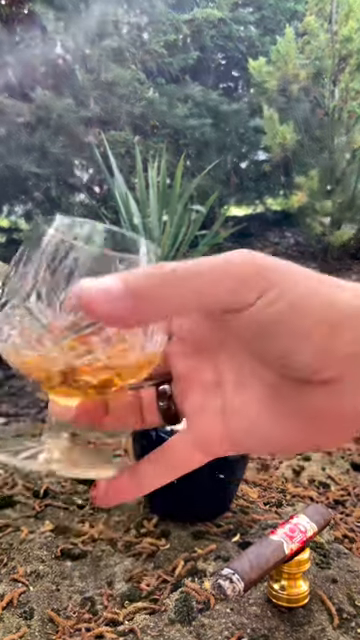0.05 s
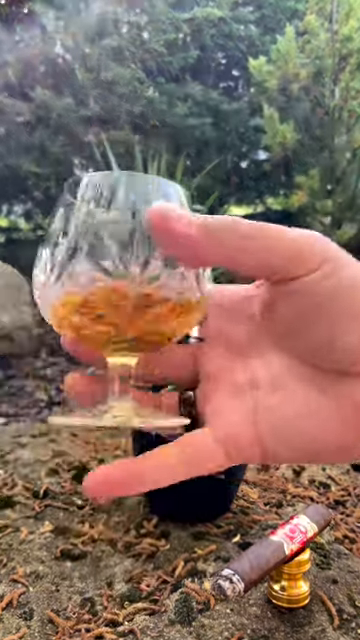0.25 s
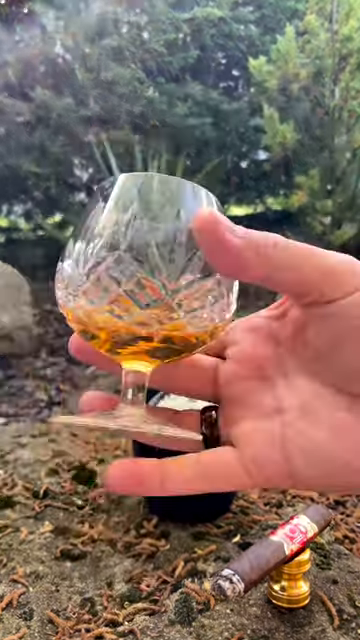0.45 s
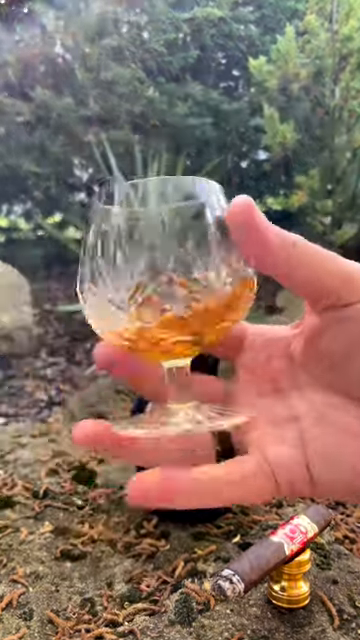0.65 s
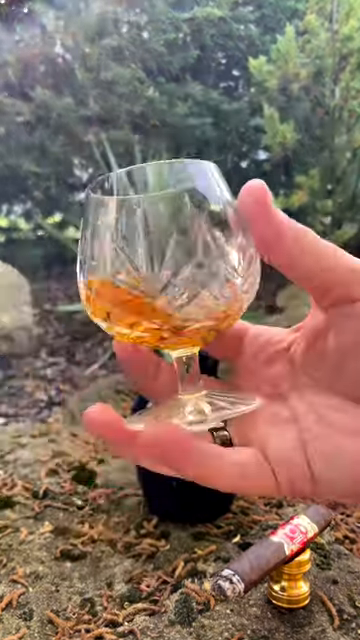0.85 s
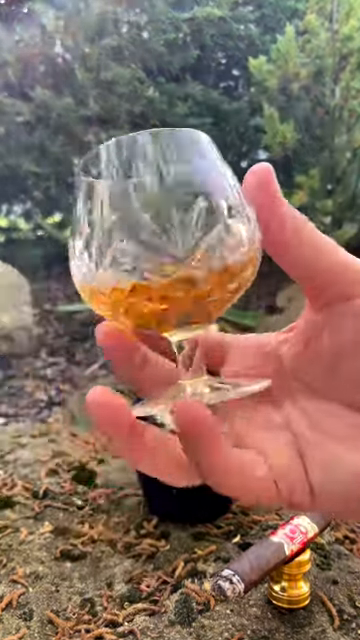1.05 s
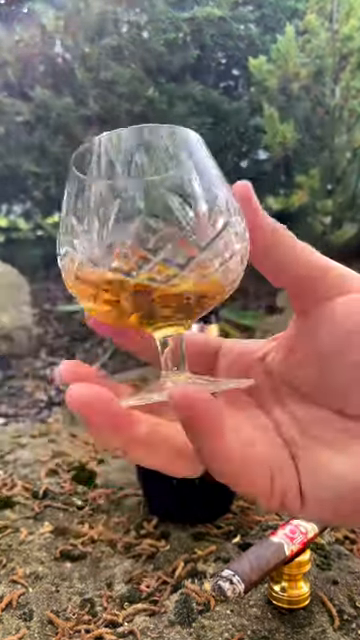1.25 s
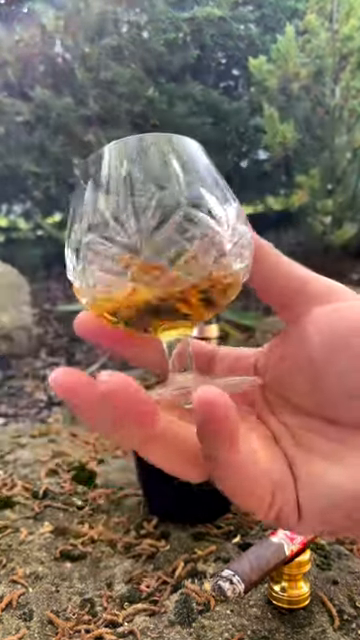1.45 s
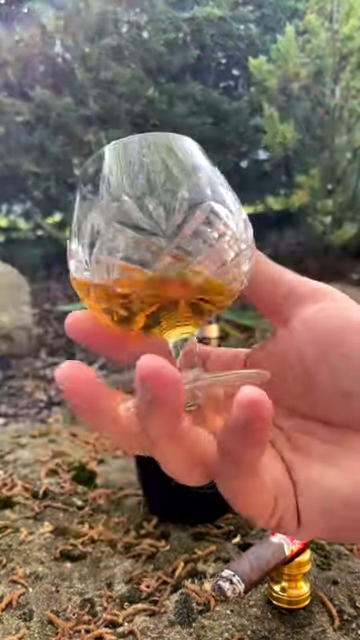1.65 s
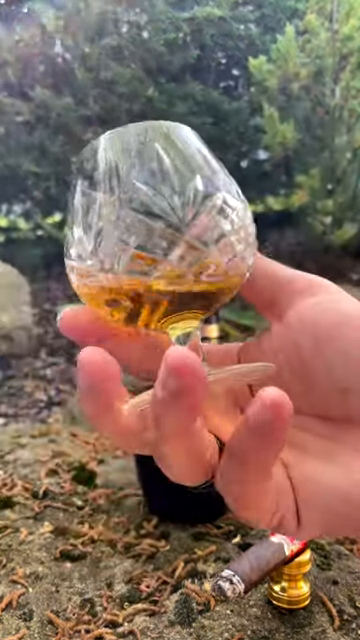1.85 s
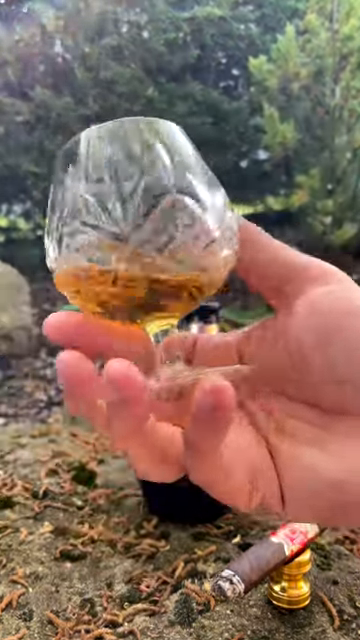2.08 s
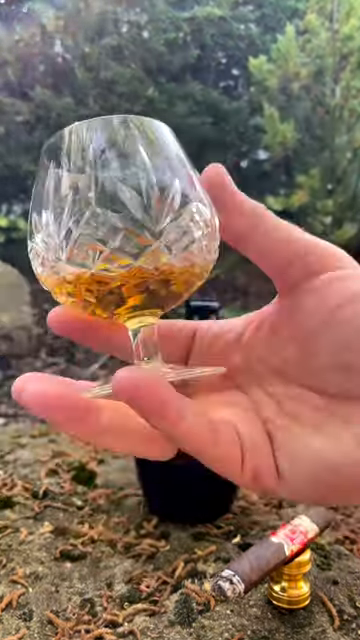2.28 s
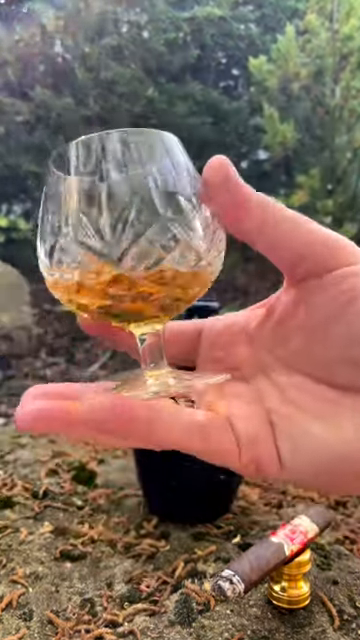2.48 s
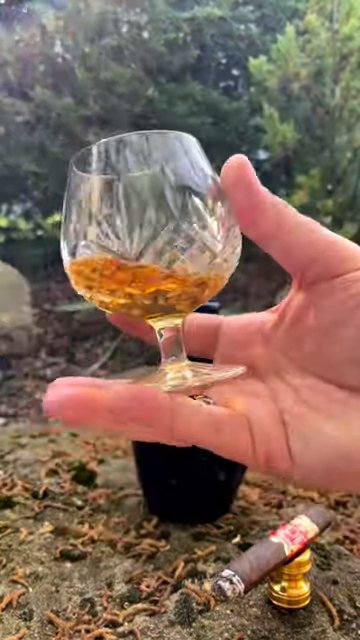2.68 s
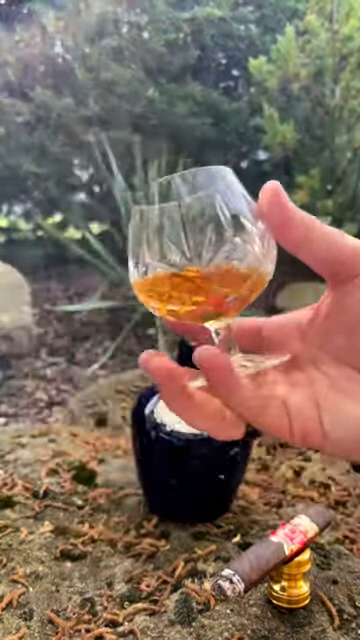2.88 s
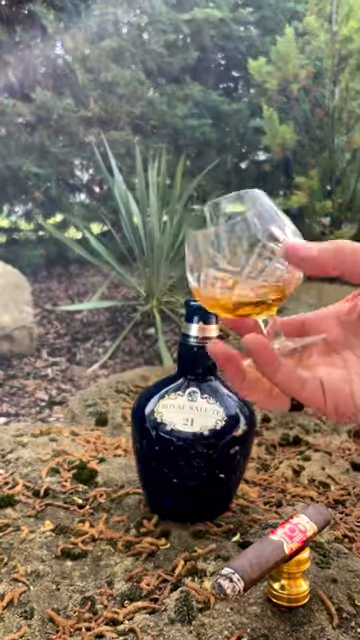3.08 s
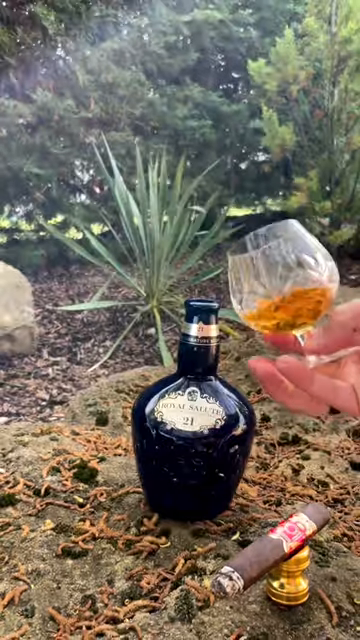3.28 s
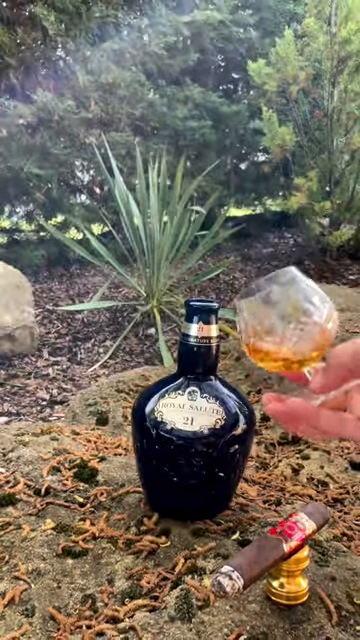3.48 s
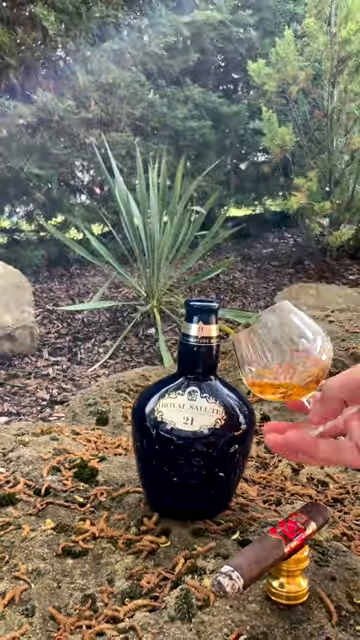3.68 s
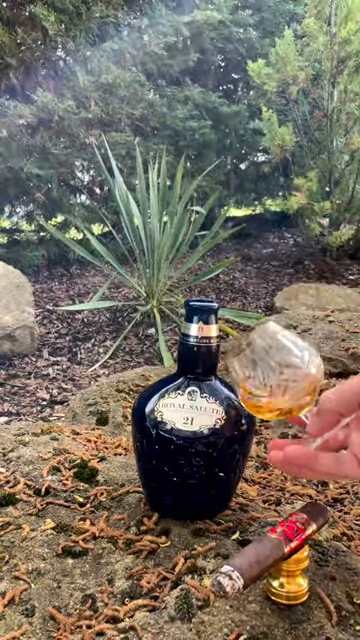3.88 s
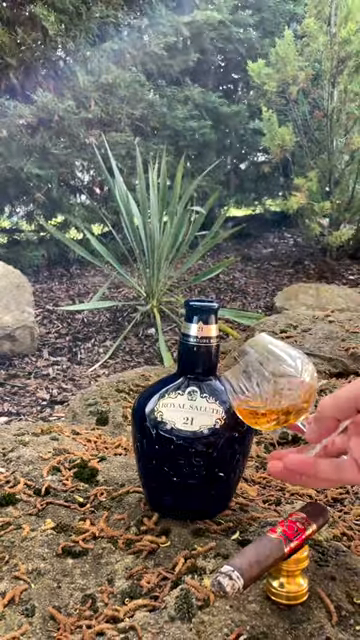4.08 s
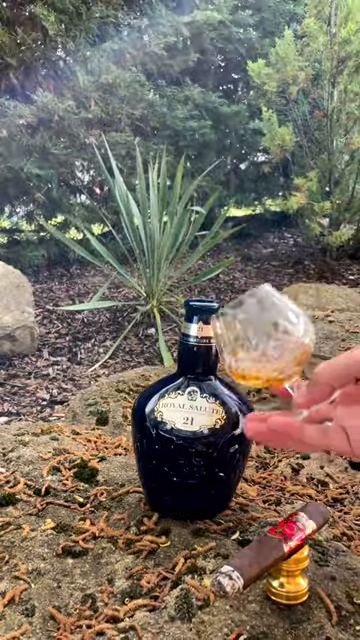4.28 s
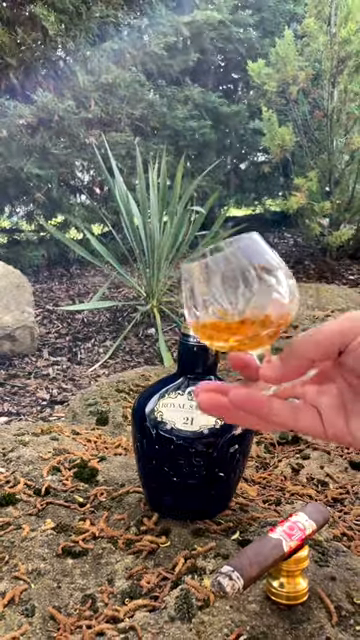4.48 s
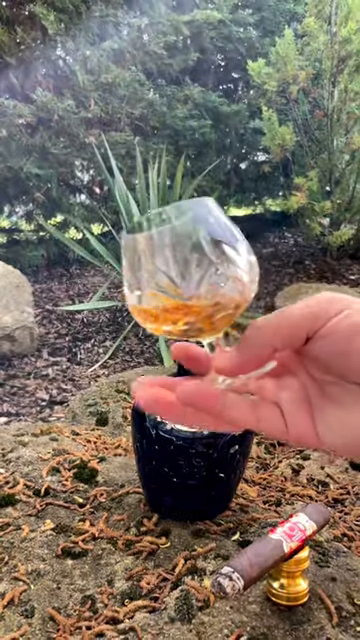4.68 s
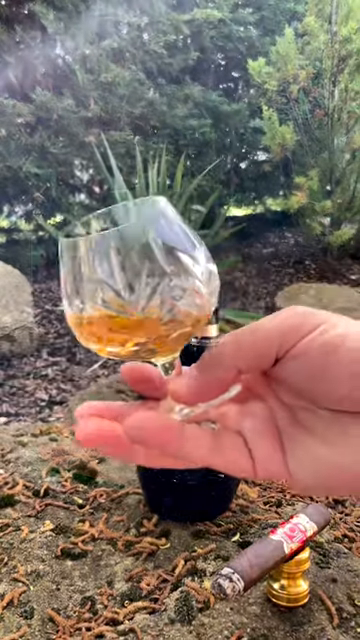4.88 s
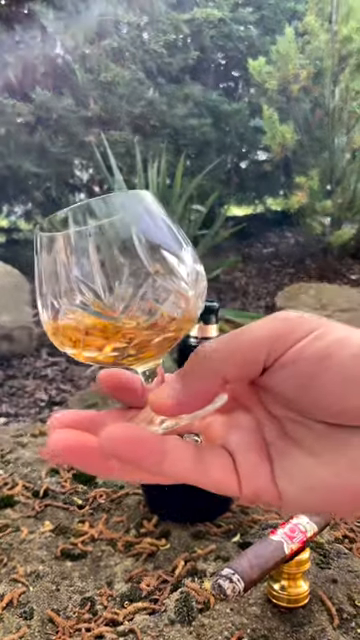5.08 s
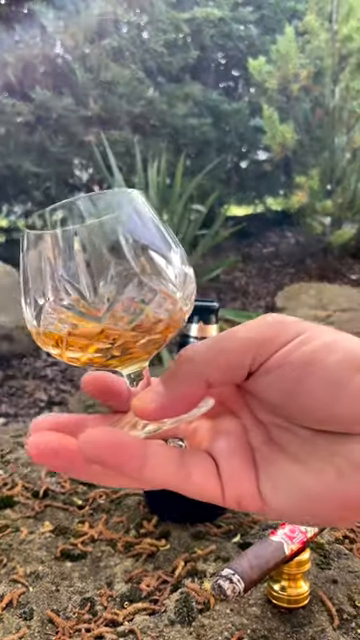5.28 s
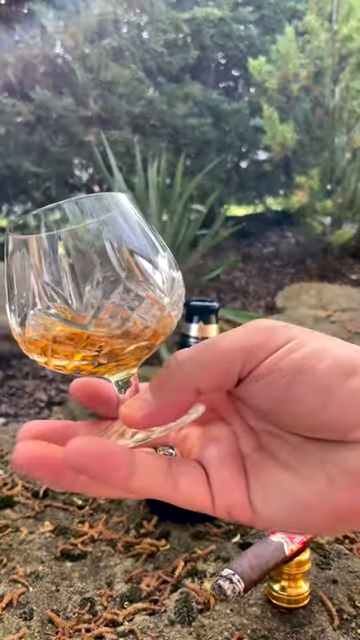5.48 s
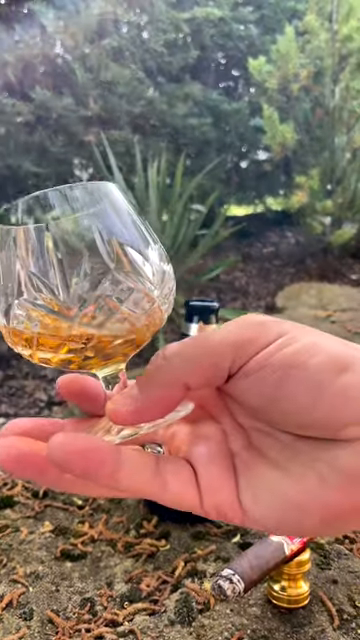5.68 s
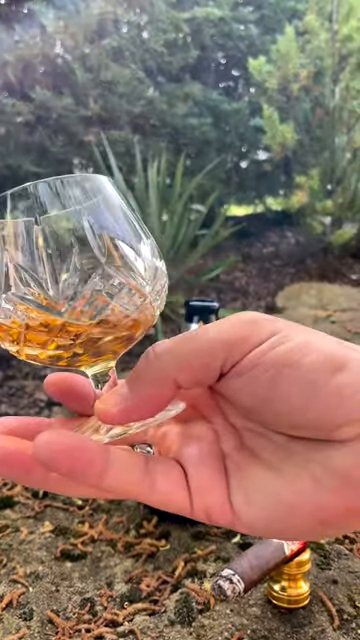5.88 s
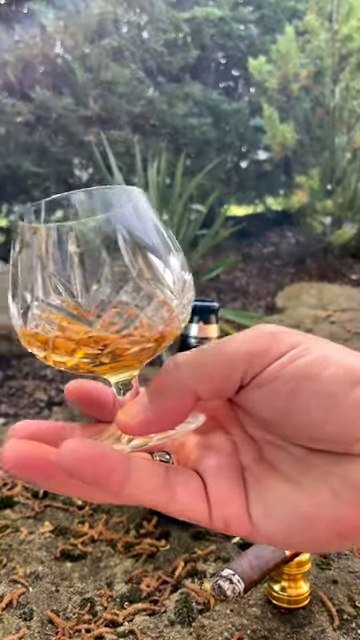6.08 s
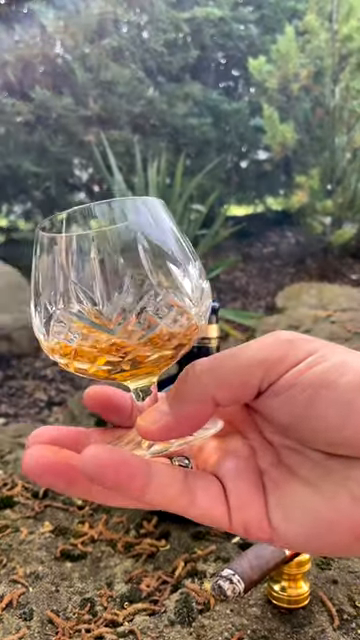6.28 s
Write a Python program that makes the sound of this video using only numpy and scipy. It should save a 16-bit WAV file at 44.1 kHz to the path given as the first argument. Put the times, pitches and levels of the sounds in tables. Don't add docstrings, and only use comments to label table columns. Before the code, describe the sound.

Close handheld stereo pickup outdoors. Four seconds of very soft road rumble, faint motor drone, scattered twitters and cloth movement lead to a sharp crystal-against-bottle double clink. The glass rings on, first bright and wobbling, shifting between left and right, then thinner and steadier with slow beating. Rustles and faint hand ticks accompany the fading tone while traffic murmurs behind.

```python
import sys
import numpy as np
from scipy import signal
from scipy.io import wavfile
from scipy.ndimage import uniform_filter1d

SR = 44100
rng = np.random.default_rng(int(sys.argv[2]) if len(sys.argv) > 2 else 0)


def amplitude_ratio(level_db):
    exponent = np.asarray(level_db, float) / 20
    return 10 ** exponent


def dump_mix(stems):
    frames = np.atleast_2d(stems).T
    limited = np.clip(frames, -1, 1)
    pcm = np.round(limited * 32767).astype(np.int16)
    wavfile.write(sys.argv[1], SR, pcm)


N = 279594
PORTS = np.array([[1], [-1]])

CONTACTS = [
    3.9997,
    4.0072,
    4.0609,
    4.1175,
]
# (level [dB], frequency [Hz], t60 [s], splash of reflections [dB], its treble [dB])
KNOCKS = [
    (-36, 3300, .008, -52, -3),
    (-7.5, 3520, .008, -28, -2),
    (-9, 1550, .004, -29, -4),
    (-32, 3500, .013, -44, -16),
]
KNOCK_LEAD = [.4, .4, .05, .2]
# (time [s], level [dB], frequency [Hz], t60 [s])
CLACKS = [(4.0072, -13, 1750, .006), (4.0072, -26, 6100, .008), (4.0072, -22, 7700, .008),
          (4.0074, -21, 14000, .005), (4.0074, -27, 9500, .008), (4.06062, -12.5, 2500, .005),
          (4.0075, -39, 480, .03), (4.061, -39, 560, .025), (4.0615, -28, 3300, .018),
          (4.062, -33, 5830, .016), (4.0715, -34, 5200, .014), (4.098, -45, 3700, .02),
          (4.106, -46, 3400, .015), (4.1165, -33, 3700, .012), (4.1185, -40, 5900, .014),
          (4.126, -44, 3600, .02), (4.0085, -30, 850, .008), (4.0612, -24, 945, .012),
          (4.0075, -38, 240, .03), (4.0075, -30, 4800, .01), (4.0755, -33, 2100, .01)]

# (time [s], second rim mode [Hz])
SLOSH = [
    (4.05, 2882),
    (4.11, 2894),
    (4.155, 2892),
    (4.235, 2857),
    (4.265, 2860),
    (4.33, 2897),
    (4.38, 2908),
    (4.6, 2904),
    (5.0, 2903),
]
REST_HZ, THIRD_HZ = 2907, 5211
LOW_HZ, LOW_LOADING = 1206.8, 1.35
LOADING_HZ = 5500
# (time [s], shift [Hz])
LOW_DRIFT = [(4.02, -2), (4.15, -3), (4.22, -1), (4.32, -3), (4.4, 0), (5, 0), (5.7, 1), (6.3, 3)]
ROCK_S, ROCK_PERIOD_S, ROCK_TAU_S, ROCK_HZ = 4.77, .43, 1.6, (3.2, 2.6)
# (start time [s], split [Hz])
SPLITS = [
    (4.012, 6.8),
    (4.13, 8.3),
    (4.3, 2.68),
    (4.89, 4.26),
]
FIRST_BEAT = -.32
SWING_S, SWING_TURNS, SWING_TAU_S = 4.43, .47, .5

# (time [s], left [dB], right [dB], weak/strong share
LOW_PAIR = [(4.064, -26, -27, 0.2, 0.13), (4.13, -35, -26.5, 0.57, 0.65), (4.195, -30.5, -28.5, 1, 0.9),
            (4.253, -26, -25, 0.97, 0.74), (4.3, -31, -23, 0.61, 0.16), (4.375, -33, -31, 0.73, 0.13),
            (4.46, -32, -28.5, 0.79, .15),
            (4.51, -37.5, -33, 0.76, .15), (4.701, -35.5, -34.5, 0.34, 0.2),
             (5.05, -34.5, -33.5, 0.82, 0.84), (5.401, -36.5, -36, 0.45, 0.5), (5.8, -38.5, -38, .33, 0.46)]
# (time [s], left [dB], right [dB], left
SECOND_MODE = [(4.075, -23, -21, 0), (4.135, -26.5, -22, -.15), (4.175, -36, -20.3, .1),
               (4.215, -28, -20.8, 1.1), (4.3, -21.8, -24.5, 1.05), (4.335, -23, -29.5, .9),
               (4.365, -28, -36, .7), (4.395, -27.8, -28.5, .55), (4.43, -26.8, -26.6, .45),
               (4.465, -28, -29, .45), (4.515, -34, -34, .45), (4.6, -31, -39, 1), (4.645, -33, -45.5, .8),
                (4.72, -43.5, -53, .35), (4.77, -45.5, -51, .7), (4.9, -43.5, -43.5, 1.25),
                (4.96, -48, -45, 1.6), (5.05, -50.5, -50, 2), (5.18, -54, -55.5, 2),
                (5.32, -55.5, -56.5, 1.5), (5.42, -59.5, -58, 1.5), (5.5, -59, -60, 1.4)]
# (time [s], left [dB], right [dB], left lead [rad])
THIRD_MODE = [(4.075, -32.5, -36.5, -2.6), (4.115, -35.5, -39, -2.7), (4.14, -37.5, -37.5, -3.1),
              (4.165, -38, -39.5, -3.8), (4.2, -47, -44, -4.7), (4.222, -41.5, -43.5, -6),
              (4.265, -42.5, -43.5, -6.5), (4.305, -48.5, -51, -5.9), (4.342, -56.5, -73, -5.2),
              (4.37, -57, -68, -6.3), (4.44, -63.5, -67.5, -6.3), (4.49, -64.5, -67, -6.2)]
LOW_FIRST, SECOND_FIRST, THIRD_FIRST = (-29, -24.5, 1, 3), (-31, -29, -.05), (-32.5, -36, -2.6)
LOW_FADE_DB, SECOND_FADE_DB, THIRD_FADE_DB = 7.1, 23, 170

# (frequency [Hz], t60 [s], first hit [dB], second hit [dB], bounce [dB])
GLASS = [(5015, .1, -80, -47, -80), (6165, .3, -49, -80, -48), (6245, .22, -41, -52, -50),
         (7550, .2, -48, -80, -60), (7848, .15, -36, -27, -34), (10290, .095, -18, -50, -60),
         (10467, .12, -31, -26, -28), (10742, .08, -33, -46, -80), (11234, .09, -29, -48, -80),
         (11180, .05, -16, -80, -80), (11400, .1, -32, -40, -56), (11580, .09, -32, -25, -80),
         (11755, .09, -60, -39, -45), (11890, .07, -36, -70, -29)]
# (frequency [Hz], t60 [s], first hit [dB],
# second hit [dB], bounce [dB])
BOTTLE_AND_STEM = [(163, .5, -50, -80, -80), (945, .06, -41, -37, -80), (1700, .12, -45, -47, -80),
                   (1903, .45, -57, -49, -80), (2380, .17, -52, -49, -80), (3213, .15, -80, -45, -80),
                   (3400, .17, -48, -46, -80), (4760, .06, -80, -80, -52), (5760, .06, -80, -38, -43),
                   (8898, .11, -34, -37, -80), (9232, .2, -80, -50, -58), (9640, .07, -23, -34, -50),
                   (10060, .06, -27, -44, -80), (12748, .08, -33, -33, -60),
                   (4122, .25, -80, -47, -58), (4188, .45, -55, -51, -54), (4312, .7, -53, -53, -52),
        (4635, .1, -50, -80, -80), (9479, .08, -37, -80, -80), (9776, .08, -36, -80, -80),
        (10914, .08, -35, -80, -80), (12270, .07, -35, -45, -80), (12607, .07, -35, -46, -80)]
# (frequency [Hz], lead [rad])
PORT_LEAD = [(4200, 0), (4300, .8), (6200, .6), (7850, 1.9), (8900, 2.85), (10000, 2.95), (10400, 3.1),
             (10800, 3.1), (11300, 3.6), (12750, 5.3)]
# (frequency [Hz], lead [rad])
TURNED_LEAD = [(4200, 0), (4300, .8), (6200, .6), (7850, 1.7), (8900, 2.3), (9700, 2.1), (10500, 2.6),
               (11300, 4.1), (11700, 4.1), (12750, 4.8)]

# (time [s], level [dB], rise [s], t60 [s], top [Hz])
TICKS = [(0.449, -66, 0.021, 0.3, 9300), (.495, -57.5, 0.0028, 0.18, 9000), (1.074, -62, .003, 0.39, 9600),
         (1.689, -69.5, 0.024, 0.59, 9200), (3.5547, -58, 0.0013, 0.09, 5100),
         (3.565, -58, 0.014, 0.2, 6130), (3.585, -59.5, 0.018, 0.2, 12000), (3.624, -70, .01, 0.11, 5000),
         (4.963, -55.5, .001, 0.029, 12000), (5.431, -75, 0.00075, 0.024, 9300),
         (5.919, -58.5, .001, 0.0077, 9140), (6.1669, -48.5, .001, 0.036, 13700)]

# (time [s], firing rate [Hz], level [dB], upper orders under load [dB])
BIKE = [(0, 222, -60, -16), (.4, 232, -65, -2), (.7, 239, -67, 0), (.85, 243, -72, -8),
        (1.05, 248, -70, -9), (1.2, 252, -68, -4), (1.6, 262, -65, -3), (1.72, 262, -74, -8),
        (1.76, 220, -65, -12), (2.2, 230, -69, 2), (2.9, 240, -71, 2), (3.3, 240, -85, 0)]
# (multiple [1], level [dB])
BIKE_ORDERS = [(1, 0), (2, -6), (3, -17), (4, -15), (5, -18)]
# (time [s], firing rate [Hz], level [dB], upper orders under load [dB])
TRUCK = [(0, 160, -67, -6), (.7, 168, -64, 4), (.95, 170, -65, -8), (1.3, 174, -63, -3), (2, 183, -70, 0),
         (3, 186, -76, 0), (4.6, 183, -72, -3), (5.3, 183, -67, 0), (5.9, 183, -74, -2),
         (6.34, 183, -71, -4)]
# (multiple [1], level [dB])
TRUCK_ORDERS = [(1, 0), (2, -4), (3, -14), (4, -14)]
# (start [s], end [s], start pitch [Hz], end pitch [Hz],
# level [dB])
DRONES = [(.3, 0.55, 1195, 1183, -76), (0.353, 0.86, 927, 939, -72), (.45, 0.803, 466, 480, -74),
          (.85, 1.551, 731, 774, -68.5), (0.788, 1.455, 651, 689, -73), (1.1, 1.69, 492.4, 518, -71),
          (1.746, 1.85, 651, 660, -69), (2.381, 2.576, 687, 693, -72.5), (2.699, 2.997, 1084, 1043, -74),
          (2.841, 2.96, 67.6, 62, -49.5), (3.26, 3.42, 63.5, 71, -47.5), (3.5, 3.795, 59.7, 54.3, -51.5),
          (3.378, 3.704, 122.7, 102.4, -60), (3.7, 3.83, 226.8, 219, -61.5)]

# (time [s], level [dB], frequency [Hz], length [s], left over right [dB])
CHIRPS = [(0.51, -61, 3780, 0.015, 14), (.6, -66, 3900, 0.058, 4.5), (1.783, -54.5, 4380, 0.041, 12),
          (1.82, -72, 4300, 0.12, 3), (1.868, -66.5, 2550, 0.025, 5), (5.17, -62.5, 3830, 0.026, -3.5),
          (1.812, -64, 3950, 0.027, 3), (1.84, -66, 3450, 0.054, -2), (1.85, -70, 3050, 0.029, 2),
          (1.878, -67, 4350, 0.039, 3), (1.94, -65, 3260, 0.034, 0), (3.162, -65, 4250, 0.028, 0),
          (3.172, -70, 3050, 0.026, -7), (3.205, -59.5, 3200, .028, -9), (3.228, -57, 3180, 0.017, 0),
          (3.23, -65, 2700, .035, -3), (3.238, -67, 4000, 0.03, 0), (3.305, -64, 3100, 0.022, -3),
          (3.312, -63, 3420, 0.027, 0), (3.335, -66, 3150, .02, 0), (3.445, -73, 3780, 0.018, 0),
          (3.578, -62, 2900, 0.02, 0), (5.16, -70.5, 1600, 0.037, -3), (5.165, -70, 1370, .025, 2)]
# (start [s], end [s], level [dB], start centre [Hz], end centre [Hz], spread [Hz])
FLURRIES = [
    (0.449, 0.654, -85.5, 3970, 3400, 333),
    (1.812, 1.95, -85.5, 4180, 3040, 385),
    (2.677, 2.802, -89.5, 3340, 3360, 284),
    (3.121, 3.212, -87.5, 4750, 3200, 296),
    (3.15, 3.365, -80.5, 3755, 3200, 559),
    (3.426, 3.527, -92, 3620, 3600, 306),
    (3.876, 3.96, -89.5, 3540, 3300, 287),
]

# (nearest time [s], spread [s], rumble [dB], tyre wash [dB])
PASSES = [
    (0.0, 0.12, -66, -71),
    (.5, 0.22, -63, -72.5),
    (1.1, 0.33, -75, -67),
    (2.4, 0.32, -62.5, -69),
    (3.4, 0.39, -57, -90),
    (4.16, 0.077, -57.5, -65),
    (4.55, 0.092, -66, -62),
    (4.9, 0.51, -66, -67),
    (5.7, 0.36, -61, -70.5),
    (6.34, 0.14, -64, -68),
]
# (time [s], spread [s], level [dB])
MOVES = [(.52, 0.14, -78.5), (.75, 0.083, -79), (1.35, 0.18, -78.5), (1.7, 0.2, -78), (2.2, 0.21, -73.5),
         (3.39, 0.079, -81), (3.65, 0.26, -79.5), (4.25, 0.091, -85), (4.55, .06, -71), (4.85, 0.24, -71.5),
         (5.25, 0.086, -77.5), (5.65, 0.22, -75), (6.34, 0.15, -75.5)]
# (time [s], spread [s], level [dB])
SONG = [(0.0, 0.11, -92), (.55, 0.057, -84), (1.4, 0.14, -95), (1.94, 0.12, -79.5), (2.3, 0.12, -85),
        (3.05, 0.25, -86), (3.26, 0.038, -82), (3.62, 0.038, -79.5), (4.7, 0.076, -81.5),
        (5.0, 0.31, -92.5), (5.97, 0.063, -83), (6.34, .1, -95)]
STILL_RUMBLE_DB, STILL_WASH_DB, STILL_RUSTLE_DB, STILL_TWITTER_DB = -62.5, -73, -87.5, -92
# (frequency [Hz], level [dB])
RUMBLE = [(12, -49), (20, -21.5), (42, -21.5), (69, 6.5), (140, -9), (168, -8.5), (193, -14), (228, -12),
          (400, -19.5), (520, -59.5), (880, -120)]
# (frequency [Hz], level [dB])
WASH = [(100, -32), (150, -7), (230, -12), (300, -6.5), (470, -11.5), (580, -12.5), (750, -13),
        (1000, -13.5), (1220, -17.5), (1330, -22.5), (2000, -26), (3000, -30.5), (3900, -56)]
# (frequency [Hz], level [dB])
RUSTLE = [(1880, -33.5), (3200, -15), (3970, -1), (5250, -6.5), (6620, -7), (8510, -7.5), (11500, -5.5),
          (12500, -1), (13300, -9.5)]
# (frequency [Hz], level [dB])
TWITTER = [(2200, -14.5), (2700, -13), (3300, -9.5), (4300, -7), (4800, -8), (5200, -25.5)]
# (frequency [Hz], likeness [1])
SAME = [(60, 1.0), (130, 0.98), (280, 0.81), (620, -0.43), (1340, 0.5), (2920, 0.024), (6360, 0.16),
        (13800, -0.78)]
EDGE_HZ = 13250


def evened(x):
    return x / np.sqrt(np.mean(x ** 2) + 1e-20)


def columns(rows, t):
    s, *values = np.transpose(rows)
    return [np.interp(t, s, v) for v in values]


def add(mix, s, sound):
    part = mix[:, round(s * SR):][:, :sound.shape[-1]]
    part += sound[..., :part.shape[1]]


def band(x, lo_hz, hi_hz):
    return signal.sosfilt(signal.butter(2, [lo_hz, min(hi_hz, .45 * SR)], "band", fs=SR, output="sos"), x)


def ringing(rows, first, fade_db, t):
    first = np.array(first)[:, None]
    reset = np.sin(np.pi / 2 * np.clip((t - CONTACTS[2]) / .002, 0, 1)) ** 2
    left_db, right_db, *rest = first + (columns(rows, t) - first) * reset
    free_db = fade_db * np.maximum(t - rows[-1][0], 0)
    return amplitude_ratio(np.array([left_db, right_db]) - free_db), np.array(rest)


def rim(t):
    def rotor(hz):
        return np.exp(2j * np.pi * np.cumsum(hz) / SR)

    sag = columns(SLOSH, t)[0] / REST_HZ - 1
    starts, split_hz = np.transpose(SPLITS)
    split_now = np.append(0, split_hz)[np.searchsorted(starts, t)]
    beats = FIRST_BEAT + np.cumsum(split_now) / SR
    early = SWING_TURNS * (1 - np.exp(-np.maximum(t - SWING_S, 0) / SWING_TAU_S))
    gain, share = ringing(LOW_PAIR, LOW_FIRST, LOW_FADE_DB, t)
    twin = np.clip(share, 0, 1) * np.exp(-2j * np.pi * np.array([beats + early, beats]))
    rock = np.cos(2 * np.pi * (t - ROCK_S) / ROCK_PERIOD_S) * np.exp(-(t - ROCK_S) / ROCK_TAU_S)
    rock *= np.clip((t - SWING_S) / .15, 0, 1)
    low_hz = LOW_HZ * (1 + LOW_LOADING * sag) + columns(LOW_DRIFT, t)[0] + ROCK_HZ[0] * rock
    out = gain * (1 + twin) * rotor(low_hz)

    sag = sag + ROCK_HZ[1] * (.7 + rock) * (t > SWING_S) / REST_HZ
    upper_modes = (
        (REST_HZ, SECOND_MODE, SECOND_FIRST, SECOND_FADE_DB),
        (THIRD_HZ, THIRD_MODE, THIRD_FIRST, THIRD_FADE_DB))
    for hz, rows, first, fade_db in upper_modes:
        gain, lead = ringing(rows, first, fade_db, t)
        out += gain * np.exp(.5j * lead * PORTS) * rotor(hz * (1 + sag))
    return out.real * np.clip((t - CONTACTS[1]) / 0.0014, 0, 1)


def knocks():
    out, t = np.zeros((2, N)), np.arange(SR // 2) / SR
    for s, lead, (db, hz, t60, splash_db, treble_db) in zip(CONTACTS, KNOCK_LEAD, KNOCKS):
        tone = np.sin(2 * np.pi * hz * t + lead / 2 * PORTS)
        knock = amplitude_ratio(db - 60 * t / t60) * tone * (1 - np.exp(-t / .0003))
        scatter = rng.standard_normal((3, len(t)))
        low = band(scatter[0] + .4 * scatter[1] * PORTS, 600, 3600)
        low = evened(band(low, 300, 3600))
        low = low * (amplitude_ratio(-60 * t / .025) + amplitude_ratio(-14 - 60 * t / .11))
        high = band(scatter[1] * PORTS + .6 * scatter[2], 7300, 12800)
        high = evened(band(high, 7300, 12800)) * amplitude_ratio(treble_db - 60 * t / .028)
        add(out, s, knock + amplitude_ratio(splash_db) * (low + high))
    for s, db, hz, t60 in CLACKS:
        tone = np.sin(2 * np.pi * hz * t + columns(PORT_LEAD, hz)[0] / 6 * PORTS)
        add(out, s, amplitude_ratio(db - 60 * t / t60) * tone * (1 - np.exp(-(t / .0003) ** 2)))
    return out


def short_modes():
    out, t = np.zeros((2, N)), np.arange(SR // 2) / SR
    blows = CONTACTS[1:]
    modes = [(1, row) for row in GLASS] + [(0, row) for row in BOTTLE_AND_STEM]
    for k, s in enumerate(blows):
        drift = np.cumsum(columns(SLOSH, s + t)[0] / SLOSH[0][1] - 1) / SR
        for wet, (hz, t60, *levels) in modes:
            db = levels[k]
            if db <= -80:
                continue
            lead = columns(TURNED_LEAD if k == 1 else PORT_LEAD, hz)[0]
            bent_t = t + wet * max(1, hz / LOADING_HZ) * drift
            phase = 2 * np.pi * (hz * bent_t + rng.random()) + lead / 2 * PORTS
            resets = [again - s for again, new_db in zip(blows, levels) if again > s and new_db > -80]
            held = np.clip(1 - (t - min(resets + [1])) / .001, 0, 1)
            onset = 1 - np.exp(-(t / .0013) ** 2)
            add(out, s, held * amplitude_ratio(db - 60 * t / t60) * np.sin(phase) * onset)
    return out


def ticks():
    out, t = np.zeros((2, N)), np.arange(SR // 3) / SR
    for s, db, rise, t60, top_hz in TICKS:
        grit = rng.standard_normal((3, len(t)))
        shape = np.clip(t / rise, 0, 1) * amplitude_ratio(db - 60 * np.maximum(t - rise, 0) / t60)
        add(out, s, shape * evened(band(grit[0] + 4.3 * grit[1:], 1400, top_hz)))
    return out


def engine(t, rows, orders):
    hz, db, load_db = columns(rows, t)
    out = np.zeros((2, N))
    for k, order_db in orders:
        waver = evened(np.interp(t, np.arange(60) / 9, rng.standard_normal(60)))
        phase = 2 * np.pi * k * np.cumsum(hz) / SR + .4 * waver + .0009 * k * hz * PORTS
        out += amplitude_ratio(db + order_db + (k > 1) * load_db + 3.5 * waver[::-1]) * np.sin(phase)
    return out


def drones():
    out = np.zeros((2, N))
    for s0, s1, hz0, hz1, db in DRONES:
        u = np.linspace(0, 1, round((s1 - s0) * SR))
        waver = np.interp(u, np.linspace(0, 1, 9), rng.standard_normal(9))
        hz = hz0 + (hz1 - hz0) * u + .013 * hz0 * waver
        phase = 2 * np.pi * np.cumsum(hz) / SR + hz0 / 2500 * PORTS
        swell = np.sqrt(np.sin(np.pi * u).clip(0))
        add(out, s0, amplitude_ratio(db - .5 + 3 * waver[::-1]) * swell * np.sin(phase))
    return out


def birds():
    out = np.zeros((2, N))
    notes = list(CHIRPS)
    for s0, s1, db, hz0, hz1, spread_hz in FLURRIES:
        for u, v, w, p in rng.random((240, 4)):
            note_db = db + 5 * w + 6 * np.sin(np.pi * u)
            hz = hz0 + u * (hz1 - hz0) + spread_hz * np.arctanh(1.9 * v - .95)
            notes.append((s0 + u * (s1 - s0), note_db, hz, 0.0036 + 0.015 * p, 8 * (p - w)))
    for s, db, hz, length, pan_db in notes:
        t = np.arange(0, length, 1 / SR)
        note = np.sin(2 * np.pi * hz * t * (1 - .15 * t)) * np.hanning(len(t))
        add(out, s, amplitude_ratio(db + pan_db / 2 * PORTS) * note)
    return out


def noise(spectrum, level_db, size, patchy_db):
    hop = size // 4
    hz = np.fft.rfftfreq(size, 1 / SR)
    log_hz = np.log(hz + 1)
    a, b, c, d, patches = rng.standard_normal((N // hop + 5, len(hz), 5)).T
    patches = uniform_filter1d(patches, size=8, axis=0)
    patches = evened(uniform_filter1d(patches, size=8, axis=1))
    f, db = np.transpose([(0.98, -94)] + list(spectrum) + [(SR, -120)])
    same_hz, likeness = np.transpose(SAME)
    same = np.clip(np.interp(log_hz, np.log(same_hz), likeness), -1, 1)[:, None]
    left = a + 1j * b
    right = same * left + np.sqrt(1 - same ** 2) * (c + 1j * d)
    z = np.array([left, right])
    z *= amplitude_ratio(np.interp(log_hz, np.log(f), db)[:, None] + patchy_db * patches)
    return amplitude_ratio(level_db) * evened(signal.istft(z, nperseg=size, noverlap=size - hop)[1][:, :N])


def swells(rows, still_db, t):
    s, spread, *levels = np.transpose(rows)[..., None]
    bell = np.exp(-.5 * ((t - s) / spread) ** 2)
    return [10 * np.log10(amplitude_ratio(2 * base) + (amplitude_ratio(2 * db) * bell).sum(0)) for db, base in zip(levels, still_db)]


def garden(t):
    frames = t[::256]
    levels = swells(PASSES, (STILL_RUMBLE_DB, STILL_WASH_DB), frames)
    levels += swells(MOVES, (STILL_RUSTLE_DB,), frames)
    levels += swells(SONG, (STILL_TWITTER_DB,), frames)
    rumble_db, wash_db, rustle_db, twitter_db = (np.interp(t, frames, db) for db in levels)
    rumble = noise(RUMBLE, rumble_db + 2.5, size=2048, patchy_db=1.5)
    wash = noise(WASH, wash_db + 3, size=1024, patchy_db=.7)
    rustle = noise(RUSTLE, rustle_db + 6.5, size=256, patchy_db=2.0)
    twitter = noise(TWITTER, twitter_db + 10.5, size=512, patchy_db=2.0)
    return rumble + wash + rustle + twitter


def scene():
    t = np.arange(N) / SR
    glass = rim(t) + knocks() + short_modes()
    engines = engine(t, BIKE, BIKE_ORDERS) + engine(t, TRUCK, TRUCK_ORDERS) + drones()
    return glass + ticks() + engines + birds() + garden(t)


def starved(x, hole_db, mask_db, slope_db, whim_db):
    hz, _, z = signal.stft(x, SR, nperseg=1024)
    fine_db = 10 * np.log10(abs(z) ** 2 + 1e-16)
    edges = np.unique(np.geomspace(30, 308, 24).astype(int))
    for lo, hi in zip(edges[:-1], edges[1:]):
        power = (abs(z[:, lo:hi]) ** 2).mean(1)
        level_db = 10 * np.log10(uniform_filter1d(power, size=3, axis=1) + 1e-16)
        usual_db = signal.medfilt2d(level_db + 200, (1, 15)) - 200
        whim = evened(uniform_filter1d(rng.standard_normal(level_db.shape), size=5, axis=1))
        whim = whim * np.sqrt(hz[lo] / EDGE_HZ)
        spare_db = level_db - usual_db + hole_db + 3500 / hz[lo] + whim_db * whim * (level_db < -85)
        octaves = np.log2(hz[hi] / (hz[:lo] + 1))[:, None]
        masker_db = (fine_db[:, :lo] - slope_db * octaves).max(1) - mask_db
        margin_db = np.minimum(spare_db, fine_db[:, lo:hi].max(1) - masker_db + 8 * whim[::-1])
        z[:, lo:hi] *= np.clip(margin_db / 0.46, .03, 1)[:, None]
    top = hz > EDGE_HZ
    z[:, top] *= fine_db[:, top].mean(1, keepdims=True) > -84
    return signal.istft(z, SR, nperseg=1024)[1][:, :N]


def roll_off(x):
    return signal.sosfilt(signal.butter(12, 15000, fs=SR, output="sos"), x)


def record(dry):
    mid_side = np.array([dry[0] + dry[1], dry[0] - dry[1]]) / 2
    mid, side = starved(mid_side, hole_db=3.5, mask_db=27, slope_db=31, whim_db=6)
    return roll_off(np.array([mid + side, mid - side]))


dry = scene()
out = record(dry)
dump_mix(out)
```